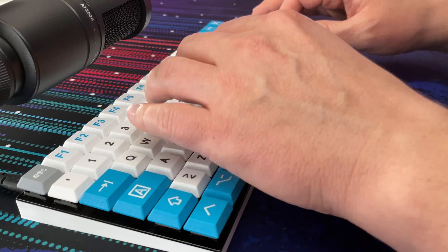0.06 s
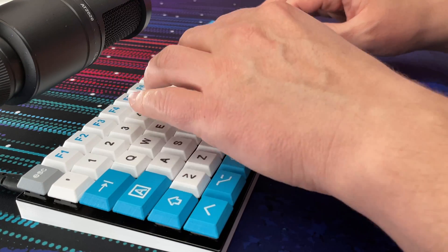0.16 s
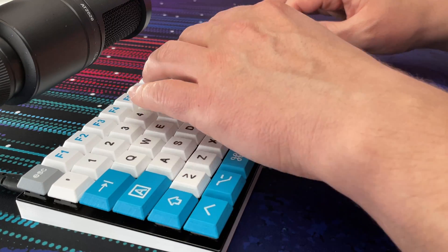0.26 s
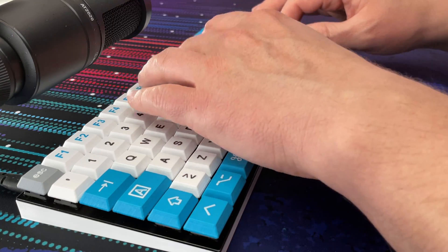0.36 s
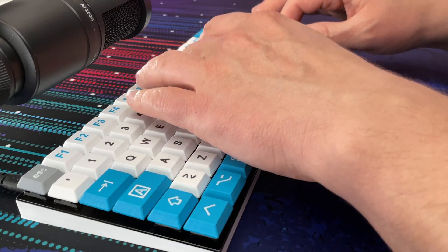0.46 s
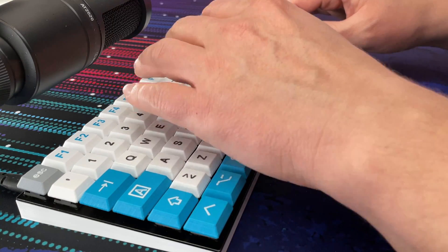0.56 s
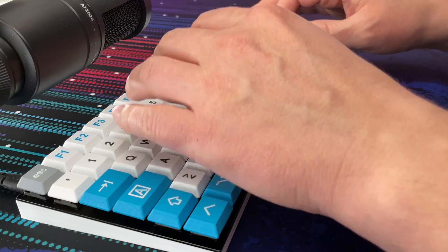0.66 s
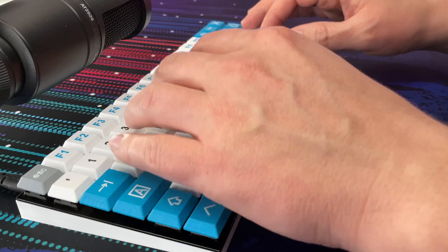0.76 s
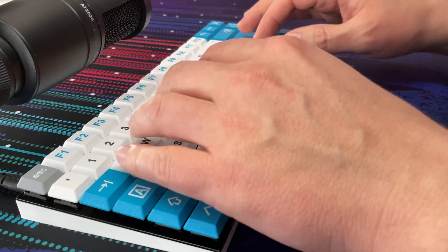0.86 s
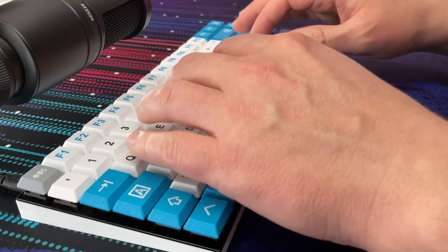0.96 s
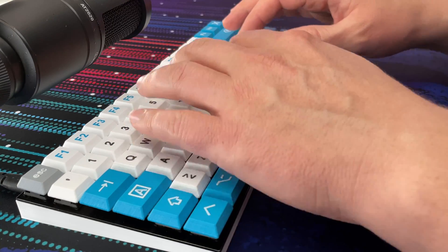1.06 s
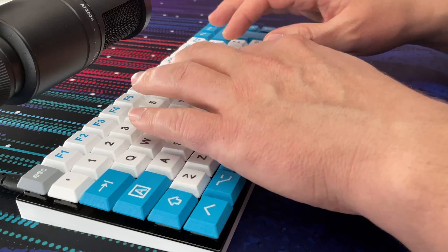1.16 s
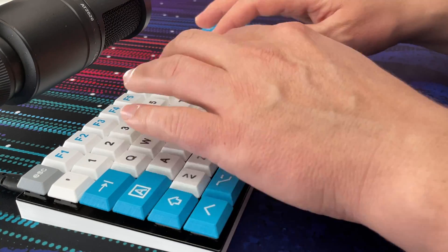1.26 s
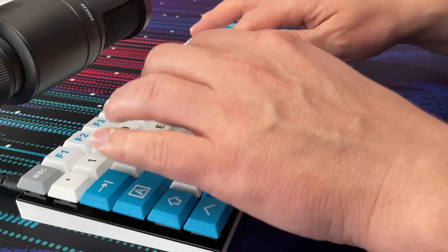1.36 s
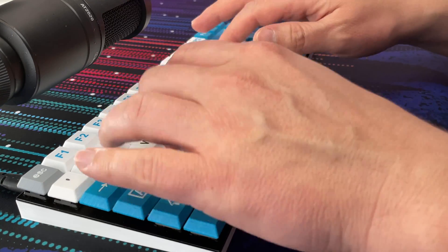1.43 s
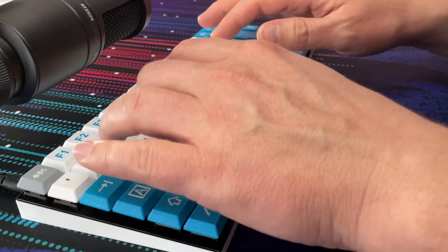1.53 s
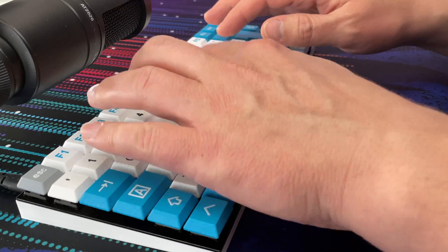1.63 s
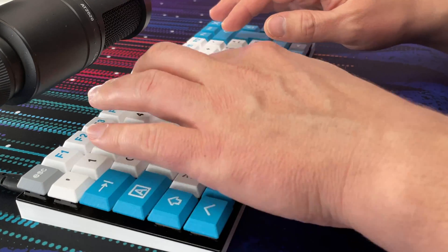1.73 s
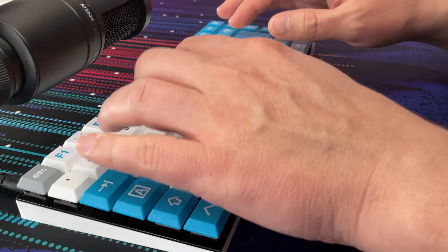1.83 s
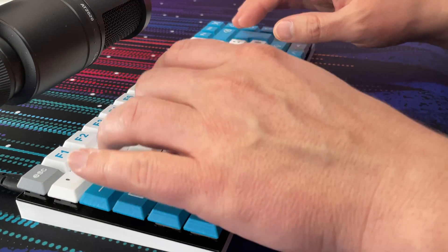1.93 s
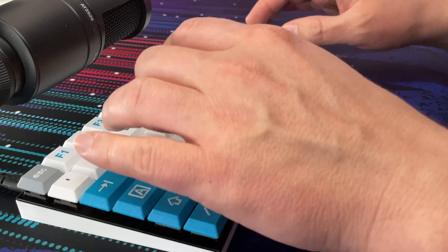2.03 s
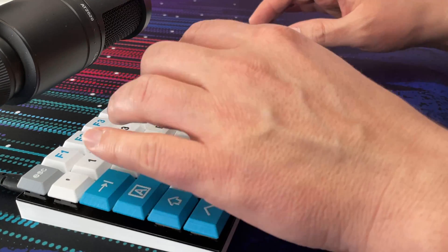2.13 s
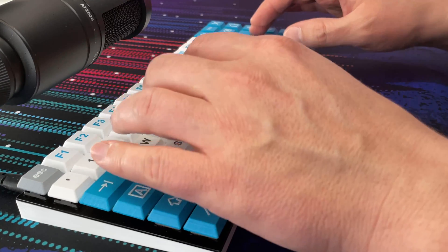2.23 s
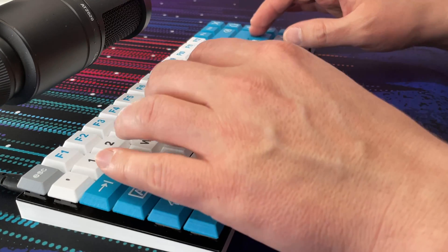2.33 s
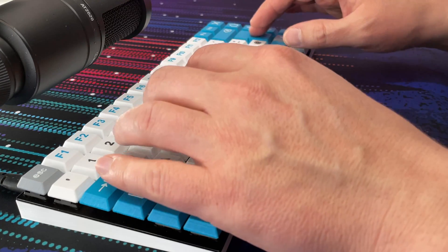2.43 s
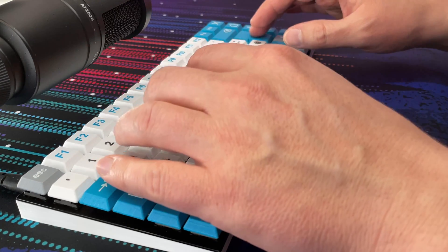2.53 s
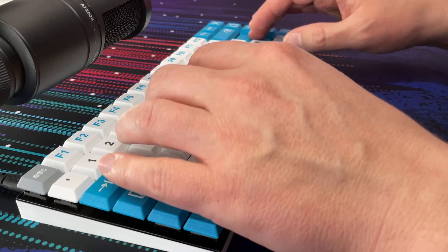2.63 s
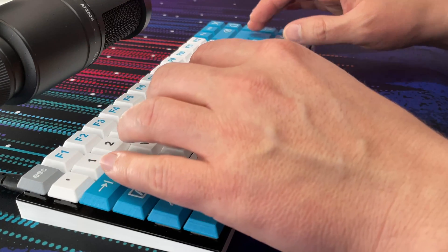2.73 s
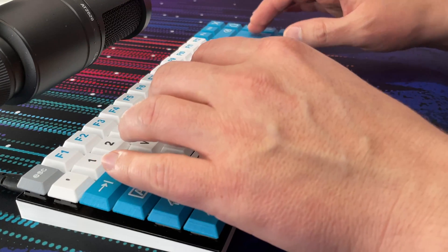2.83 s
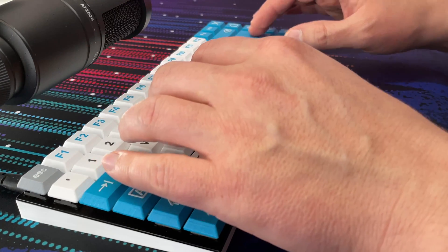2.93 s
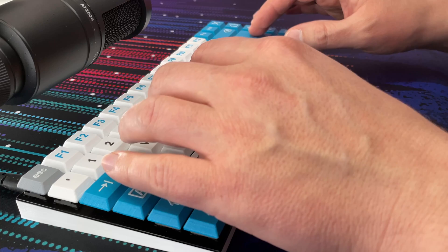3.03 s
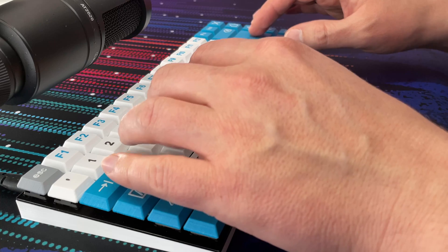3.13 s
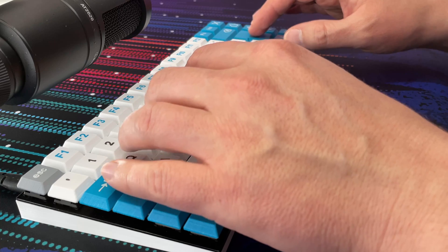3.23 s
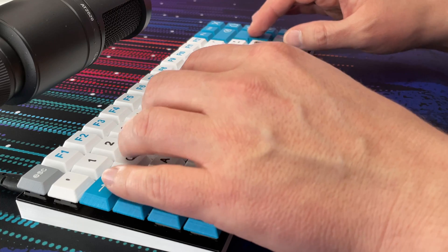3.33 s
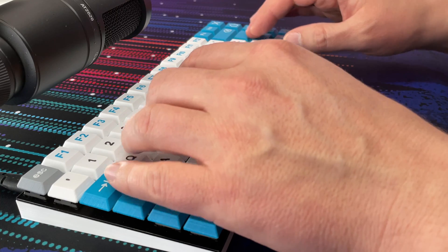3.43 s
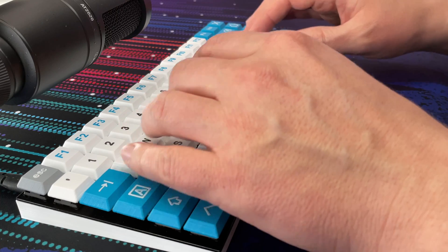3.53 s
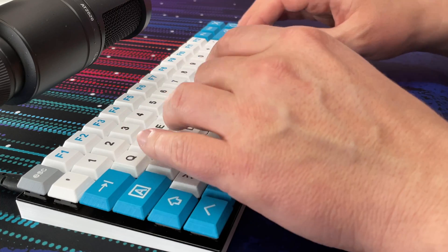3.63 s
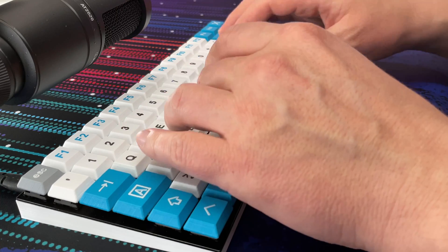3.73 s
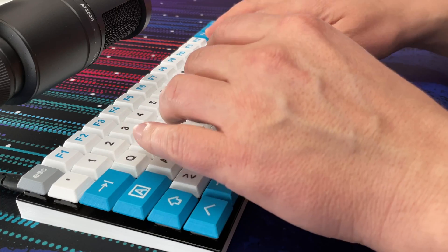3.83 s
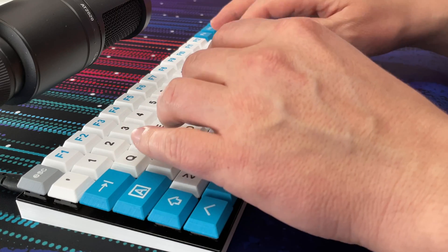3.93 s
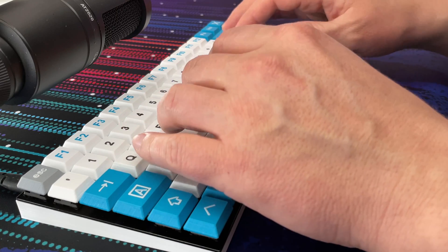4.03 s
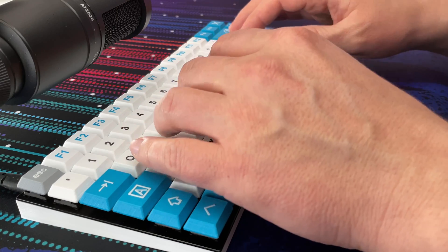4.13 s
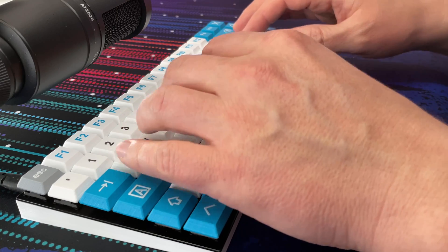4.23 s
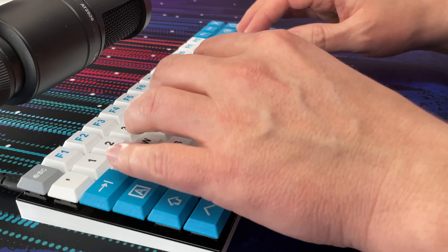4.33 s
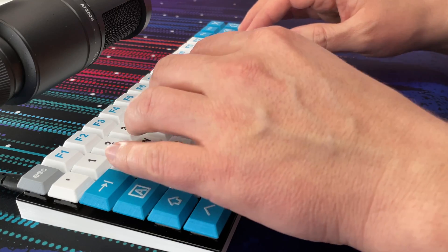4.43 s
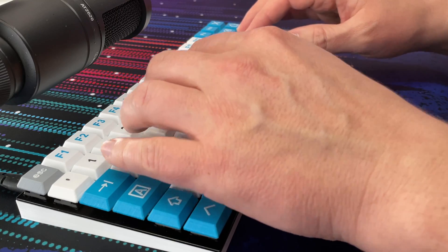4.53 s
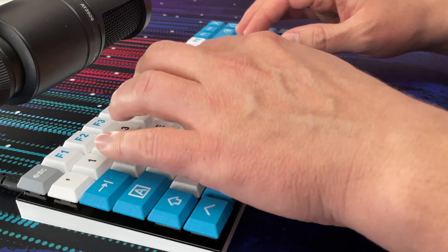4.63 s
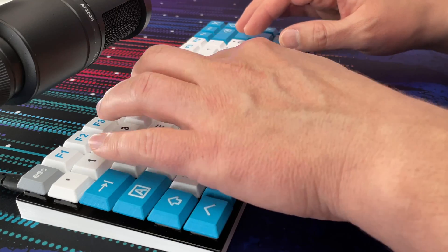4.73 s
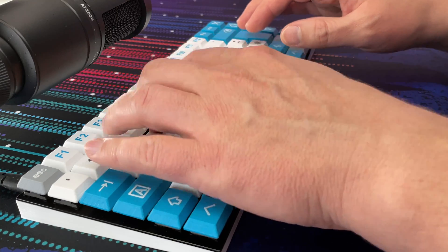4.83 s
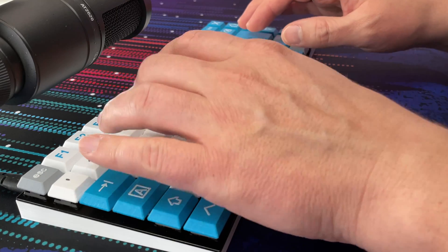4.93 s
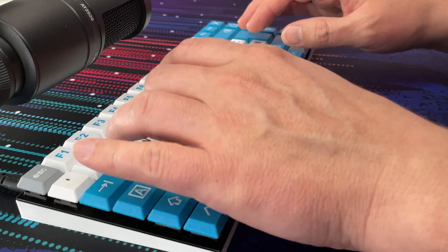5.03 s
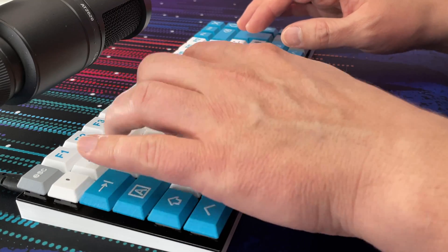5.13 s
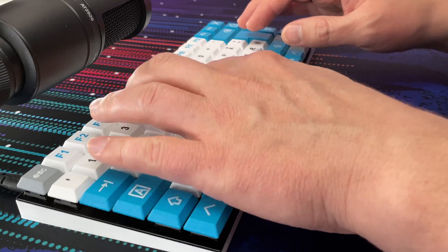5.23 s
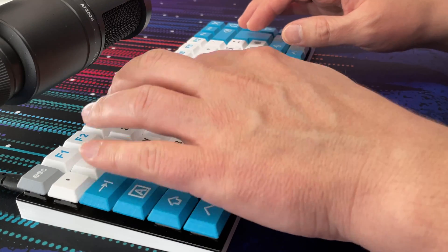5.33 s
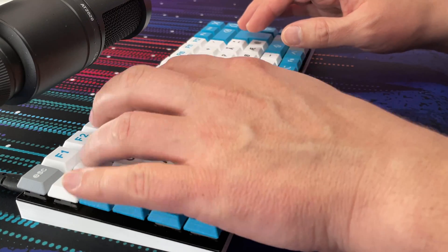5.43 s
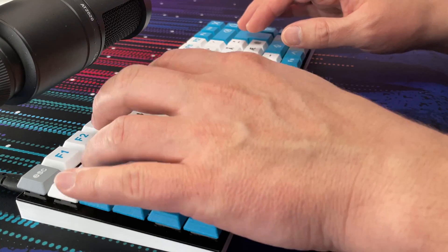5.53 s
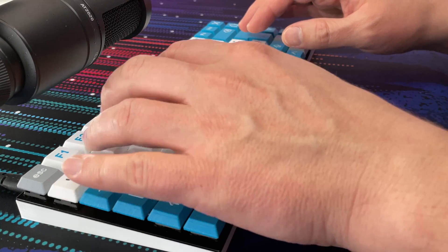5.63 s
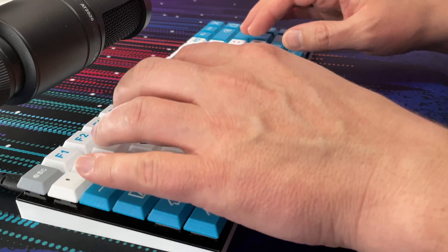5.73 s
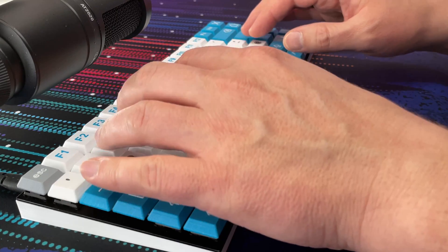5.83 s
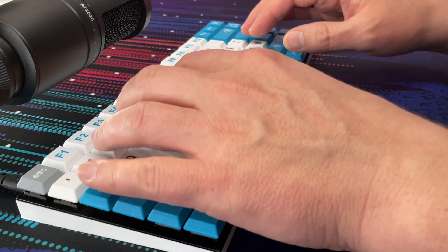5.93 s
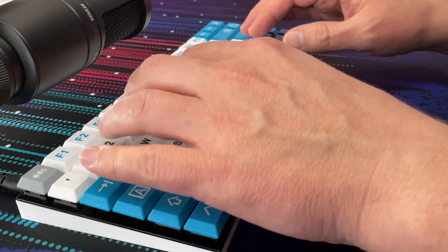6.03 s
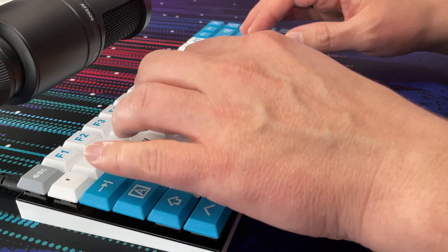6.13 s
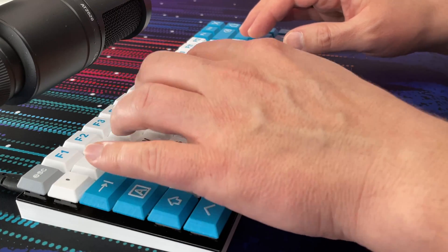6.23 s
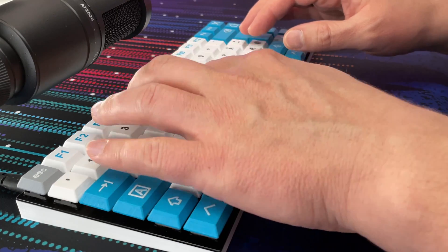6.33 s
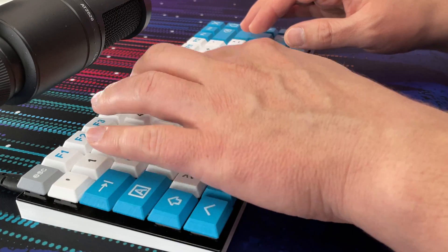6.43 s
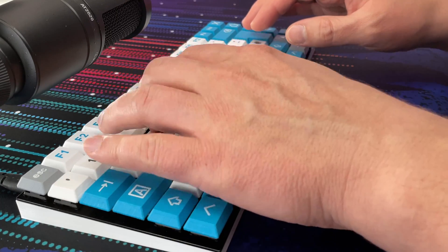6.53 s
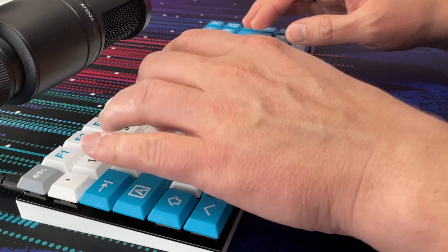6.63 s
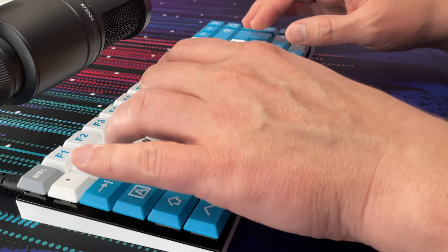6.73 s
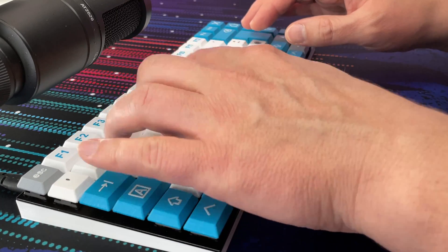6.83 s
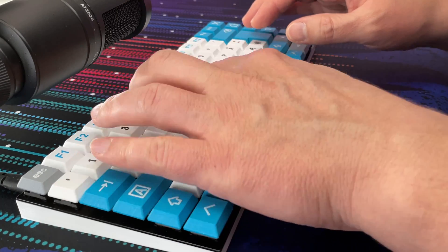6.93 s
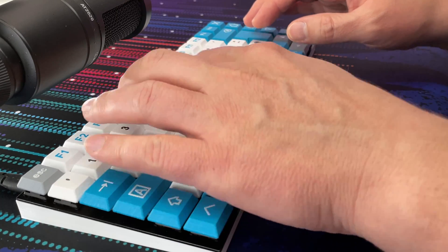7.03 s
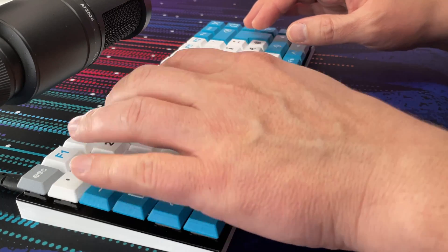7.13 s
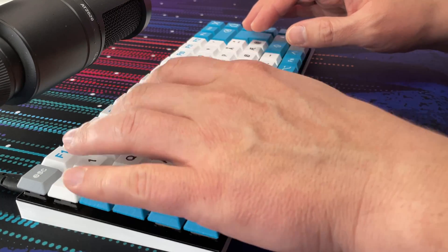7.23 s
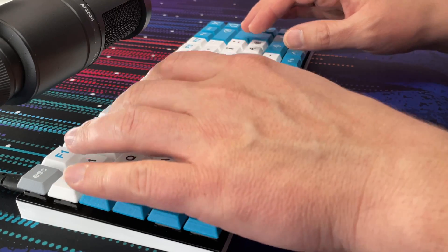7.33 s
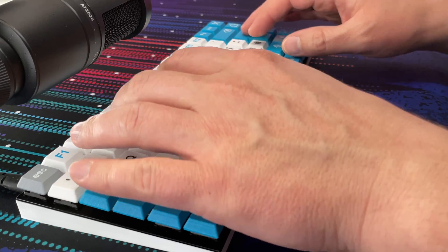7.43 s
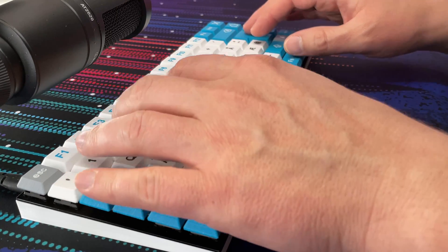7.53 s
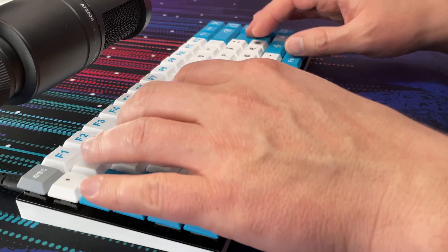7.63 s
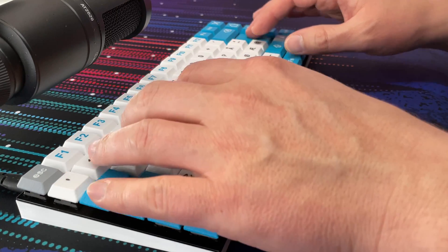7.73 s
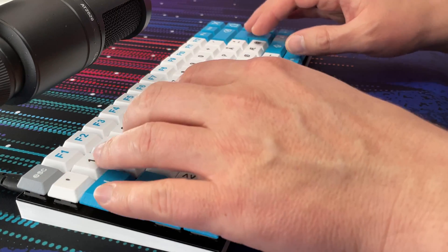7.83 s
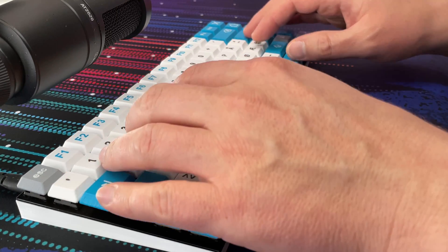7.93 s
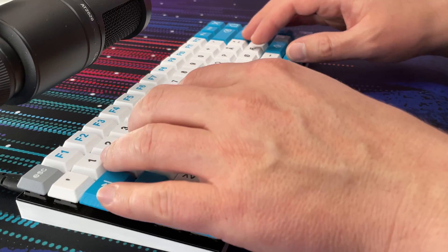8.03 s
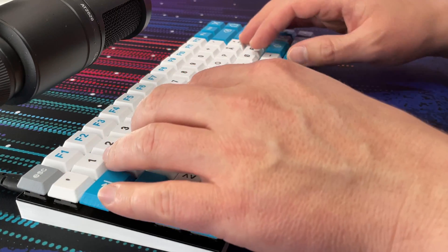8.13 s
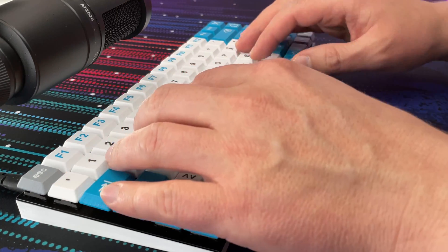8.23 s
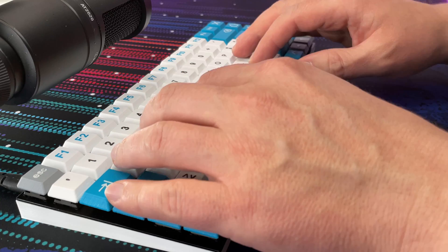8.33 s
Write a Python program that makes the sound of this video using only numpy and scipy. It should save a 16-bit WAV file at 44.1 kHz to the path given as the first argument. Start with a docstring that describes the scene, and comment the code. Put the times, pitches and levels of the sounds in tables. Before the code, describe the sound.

In a quiet room, fingers type on a small mechanical keyboard, with the microphone a hand's width away on the same desk. A light release clicks at 0.1 seconds, then a strong bright clack at 0.4 and its return, with another release at 0.6. After a pause, five or six keys come quickly from 1.1 to 1.9, each a hard plastic click, small rattle and low desk thump, followed by a lighter snap back. A lone softer key falls at 2.55. Skin barely brushes near 3.5, two keys follow at 3.65 and 3.8, and a muted press at 4.25. From 4.7 to 7.3 keys arrive steadily but unevenly, the sharpest near 6.9, then a last one at 7.6. Faint scraping over caps closes the scene until 8.4. Spring pings are nearly inaudible; faint low rumble and a distant motor hum, fullest around 4.6, lie underneath.

```python
"""Fingers typing in bursts on a small mechanical keyboard, over quiet room noise and a distant motor.
A microphone stands on the same desk, a hand's width away. Each key is touched, slides, stops and snaps back.
Caps and case are decaying modes struck by short pushes, slides are noise coloured by one cap,
and the desk thumps up the stand. Springs ping faintly as tone pairs; skin brushes over the caps twice.
The motor is a sum of sine orders, the room filtered noise."""
import sys
import numpy as np
from scipy import signal
from scipy.fft import rfft, irfft
from scipy.io import wavfile
from scipy.ndimage import uniform_filter1d

SR = 44100
rng = np.random.default_rng(int(sys.argv[2]) if len(sys.argv) > 2 else 0)


def to_wav(s):
    """Save 16-bit WAV."""
    ch = np.atleast_2d(s).T  # columns
    pcm = np.round(np.clip(ch, -1, 1) * 32767)  # PCM
    wavfile.write(sys.argv[1], SR, pcm.astype(np.int16))


N = 369558

# Modes of caps and plate. Each row: frequency in Hz, relative level in dB, t60 in seconds.
CAP_MODES = [(1213, -12.5, 0.036), (1760, -5.5, 0.009), (2226, -6.5, 0.011), (2770, -7.5, .012),
             (3200, -3, 0.009), (3744, -6.5, 0.011), (4172, 0, 0.0073), (4530, 0, 0.004),
             (6290, -4, 0.0037), (6770, -1.5, 0.0047), (7975, -5.5, 0.0037), (10960, -11.5, 0.0057),
             (14760, -20, 0.0076)]
# Modes of the keyboard case. Each row: frequency in Hz, relative level in dB, t60 in seconds.
CASE_MODES = [(185.2, -.5, .06), (251, -5.5, 0.098), (304.5, -4.5, 0.057), (390, -3.5, 0.03),
              (474, -8, 0.071), (637, -11, 0.045), (900, -12, 0.024)]
# Modes of desk and stand. Each row: frequency in Hz, relative level in dB, t60 in seconds.
DESK_MODES = [(28, -16, 0.087), (43.3, -5, 0.4), (77.4, -0.5, .2), (109.4, 4, 0.099), (149.4, -8, 0.079)]


def undb(db):
    """Decibels to amplitude."""
    return 10 ** (np.asarray(db) / 20)


def add(out, start_s, sound):
    """Mix a sound in at start_s, cut at the end of out."""
    i = int(start_s * SR)
    out[i:i + len(sound)] += sound[:len(out) - i]


def bump(length_s):
    """Smooth force of a soft contact."""
    return np.hanning(int(length_s * SR) + 2)[1:]


def ring(modes, gains, push, length_s, detune=0.):
    """Decaying modes driven by a short push; peak 1."""
    hz, db, t60_s = np.transpose(modes)[:, :, None]
    t = np.arange(int(length_s * SR)) / SR
    decay = np.exp(-np.log(1000) * t / t60_s)
    tones = np.sin(2 * np.pi * hz * (1 + detune) * t)
    body = (gains * undb(db) * tones * decay).sum(0)
    sound = signal.fftconvolve(body, push)
    return sound / np.abs(sound).max()


def air_noise():
    """Room rumble and microphone hiss: noise shaped to a spectrum."""
    # Each row: frequency in Hz, relative density in dB per Hz.
    spectrum = [(20, 1), (70, -2), (160, -22), (500, -28.5), (900, -40), (2500, -44), (15000, -50)]
    rms_db, top_hz = -66.5, 15800
    knot_hz, knot_db = np.transpose(spectrum)
    hz = np.maximum(np.arange(N // 2 + 1) * SR / N, 1)
    gain = undb(np.interp(np.log(hz), np.log(knot_hz), knot_db)) * (hz < top_hz)
    noise = irfft(rfft(rng.standard_normal(N)) * gain, N)
    return noise * undb(rms_db) / np.std(noise)


def motor():
    """Orders of a far motor that swell and fade, the weak ones at random, on a wandering speed."""
    # Each row: time in seconds, first order rms in dB, fourth order rms in dB.
    levels = [(0, -74, -91), (1, -94.5, -96), (2.198, -77, -103), (3.398, -76, -80.5), (4.6, -61.5, -81.5),
              (6.301, -68, -89.5), (8.38, -73, -92)]
    # Weak orders. Each row: multiple of the motor frequency, median rms level in dB.
    weak_orders = [(5, -95), (8, -98), (10, -101)]
    mean_hz, wander_share, weak_swing_db = 68.9, 0.0067, 6.0
    t = np.arange(N) / SR
    knot_s, first_db, fourth_db = np.transpose(levels)
    wander = np.interp(t, np.arange(40) / 4, rng.standard_normal(40))
    phase = 2 * np.pi * np.cumsum(mean_hz * (1 + wander_share * wander)) / SR
    out = undb(np.interp(t, knot_s, first_db)) * np.sin(phase)
    out += undb(np.interp(t, knot_s, fourth_db)) * np.sin(4 * phase)
    for order, db in weak_orders:
        swing_db = weak_swing_db * np.interp(t, np.arange(30) / 3, rng.standard_normal(30))
        out += undb(db + swing_db) * np.sin(order * phase)
    return np.sqrt(2) * out


def strokes():
    """Stops (s, dB, Hz, treble, knock, thump, contact) and touches (s, dB, Hz, slide dB, s, speeds)."""
    # Each row: finger lands in seconds, bottom in seconds, top in seconds, landing tick in dB,
    # bottom click in dB, top click in dB, cap pitch down in Hz, cap pitch up in Hz, treble down in dB,
    # treble up in dB, case knock down in dB, case knock up in dB, desk thump down in dB.
    keys = [(0.3544, 0.378, 0.4603, -44.5, -18, -24, 3610, 3490, 10, 14.5, -47.5, -46, -30.5),
            (1.0906, 1.1067, 1.1724, -35, -25.5, -29, 3280, 3200, 0, .5, -56, -56, -35.5),
            (1.299, 1.313, 1.3954, -38, -24.5, -29, 4440, 4500, 11, 11.5, -50.5, -45.5, -33.5),
            (1.417, 1.4367, 1.5239, -33.5, -25, -26, 4050, 3780, 4.5, 7.5, -41, -47, -30),
            (1.6346, 1.6498, 1.726, -28, -22.5, -24.5, 3290, 2960, 8.5, 12.5, -49.5, -52, -32),
            (1.8405, 1.8525, 1.927, -28, -20, -24, 4710, 4090, 2, 10, -40, -51.5, -27),
            (2.541, 2.5584, 2.6586, -55, -29, -30.5, 4570, 2305, 8.5, 14, -39, -44, -36),
            (3.6106, 3.6457, 3.7316, -42, -27, -30.5, 4310, 3270, 11.5, 9, -51, -50.5, -32.5),
            (3.7818, 3.795, 3.8755, -39.5, -23.5, -32, 4570, 3380, 12.5, 6.5, -45, -47.5, -31),
            (4.1893, 4.2462, 4.35, -45, -44, -31.5, 1870, 3410, -4, 5, -50.5, -38, -38),
            (4.653, 4.6782, 4.7842, -47, -24, -27.5, 4270, 2740, 0.5, 11, -58.5, -63.5, -34.5),
            (4.7749, 4.8032, 4.8716, -32.5, -27.5, -24.5, 2820, 4320, 11, 7, -46, -47, -33.5),
            (4.9885, 5.013, 5.097, -34.5, -23, -27, 4080, 2230, 7.5, 10, -41, -50.5, -28.5),
            (5.176, 5.1899, 5.2814, -34, -21, -32, 3720, 2760, 6.5, 11, -55, -57, -33.5),
            (5.4034, 5.4373, 5.5496, -51, -25.5, -34.5, 1800, 1930, 10.5, 7.5, -43.5, -48.5, -43.5),
            (5.8638, 5.8964, 6.0084, -38, -29.5, -34, 3550, 3390, 14.5, 4.5, -40, -39, -31),
            (6.3, 6.319, 6.4127, -34, -23.5, -27, 4260, 3360, 3.5, 11.5, -57, -54.5, -38.5),
            (6.4828, 6.5015, 6.5873, -30.5, -22.5, -26, 3560, 4050, 9, 9, -53, -46.5, -32.5),
            (6.681, 6.7076, 6.8011, -32.5, -24.5, -22.5, 3640, 3810, 10, 13, -49, -46, -30),
            (6.8625, 6.8774, 6.9842, -39, -17.5, -24, 4320, 3360, 6.5, 9.5, -54, -52, -31),
            (7.2, 7.2245, 7.3218, -33.5, -25, -34.5, 3710, 2620, 13.5, 12.5, -43.5, -49.5, -35.5),
            (7.607, 7.6242, 7.7469, -49.5, -21, -34.5, 2730, 2340, 16, 12.5, -38, -44, -34)]
    # Held keys let go. Each row: top in seconds, click in dB, cap pitch in Hz, treble in dB, knock in dB.
    held = [(0.101, -34, 3090, 8.5, -50), (0.612, -31.5, 5400, 9, -44.5)]
    # Fingers grazing caps, caps shifting. Each row: start in seconds, tick in dB, cap pitch in Hz.
    grazes = [(.045, -51, 3010), (.418, -47, 3430), (1.085, -50, 2800), (1.362, -54, 3810),
              (1.477, -57, 1200), (1.632, -47, 3400), (1.692, -47, 1430), (2.0927, -60, 2620),
              (2.508, -64, 1880), (2.615, -58, 4000), (2.6395, -44, 7410), (4.2123, -46, 3170),
              (4.252, -52, 4200), (4.341, -43, 3380), (4.713, -52, 2750), (5.168, -42, 3930),
              (5.2317, -52, 4470), (5.261, -42, 3290), (5.272, -43, 2760), (5.511, -54, 1940),
              (5.876, -47, 3120), (5.997, -43, 3400), (6.293, -50, 4220), (6.381, -50, 3270),
              (6.756, -51, 1400), (6.846, -38, 3300), (6.931, -49, 3300), (7.398, -64, 2720),
              (7.434, -62, 2500), (7.72, -38, 6490)]
    # A pressing finger holds the cap still. Columns: rebound share, plate in dB, snap share.
    bottom_contact = (.15, -3.5, .9)
    # A freed cap rattles. Columns: rebound share, plate in dB, snap share.
    top_contact = (.42, 2.5, .55)
    fall_slide_db, ref_fall_s, speed_power = -55, .018, 1.2  # a faster fall slides louder
    start_speed = .3  # of a pressed key, share of its speed at the stop
    rise_s, lift_db, rise_slide_db = .032, -38, -61  # lift tick is relative to the top click
    top_thump_db = -14.5  # relative to the top click
    graze_slide_db, graze_s = -21, .028  # slide is relative to the tick

    stop, touch, tops = [], [], list(held)
    for (land_s, bottom_s, top_s, tick_db, down_db, up_db, down_hz, up_hz,
         treble_db, up_treble_db, knock_db, up_knock_db, thump_db) in keys:
        fall_s = bottom_s - land_s
        slide_db = fall_slide_db - 20 * speed_power * np.log10(fall_s / ref_fall_s)
        stop.append((bottom_s, down_db, down_hz, treble_db, knock_db, thump_db, *bottom_contact))
        touch.append((land_s, tick_db, down_hz, slide_db, fall_s, start_speed, 1))
        tops.append((top_s, up_db, up_hz, up_treble_db, up_knock_db))
    for s, db, hz, treble_db, knock_db in tops:
        stop.append((s, db, hz, treble_db, knock_db, db + top_thump_db, *top_contact))
        touch.append((s - rise_s, db + lift_db, hz, rise_slide_db, rise_s, 0, 1))
    for s, db, hz in grazes:
        touch.append((s, db, hz, db + graze_slide_db, graze_s, 1, 0))
    return stop, touch


def click(hz, treble_db, chance, rattle_s, rebound, plate_db, snap):
    """A contact and weaker rebounds crack and ring the cap; modes near its own pitch gain most."""
    mode_hz, count = np.array(CAP_MODES)[:, :1], len(CAP_MODES)
    gain_db = 5.6 * np.exp(-(np.log(mode_hz / hz) / 0.27) ** 2)
    gain_db = gain_db + treble_db * (mode_hz > 5500) + plate_db * (mode_hz < 1500)
    gain_db = gain_db + 1.8 * chance[:count, None]
    gains = undb(gain_db) * (-1) ** np.arange(count)[:, None]
    push = np.zeros(400)
    push[0] = 1
    when = (rattle_s * SR * np.abs(chance[count:count + 6])).astype(int) + 7
    np.add.at(push, np.minimum(when, 399), rebound * chance[count + 6:count + 12])
    crack = np.convolve(np.diff(push, prepend=0), bump(.0001))  # the bare contact, far up the treble
    sound = ring(CAP_MODES, gains, push, .05, 0.04 * chance[:count, None][::-1])
    add(sound, 0, undb(treble_db - 10) * crack)
    sound += snap * ring([(hz, 0, .004)], -1, push, .05)  # short snap of the stem
    return sound


def slips():
    """Dense uneven slips of plastic on plastic; rms 1."""
    uneven_db = 3.5 * np.minimum(rng.exponential(size=N + SR), 5)
    x = rng.standard_normal(N + SR) * undb(uneven_db)
    return x / np.std(x)


def grit(slipping, cap):
    """Slips take the colour of the one cap they shake, its ring damped."""
    damp_s = .0006  # time constant under a finger
    colour = cap[:400] * np.exp(-np.arange(400) / (damp_s * SR))
    return signal.fftconvolve(slipping, colour / np.linalg.norm(colour))


def room():
    """Level of loose caps shivering after a contact, plus the fainter, longer tail off the walls."""
    shiver_t60_s, shiver_db = 0.044, -20
    room_t60_s, room_db = 0.26, -41
    t = np.arange(int(.3 * SR)) / SR
    return undb(shiver_db - 60 * t / shiver_t60_s) + undb(room_db - 60 * t / room_t60_s)


def hollow():
    """Noise with the colour of the case; rms 1."""
    sound = signal.fftconvolve(rng.standard_normal(N), ring(CASE_MODES, 1, np.ones(1), 0.046))[:N]
    return sound / np.std(sound)


def touches():
    """A light tick, then a scrape that follows the slide's speed; the finger's weight nudges the desk."""
    grip_db, tail_db, case_db = 4.5, -7, -6.5
    air, solid, slide = np.zeros((3, N))
    rows, tail, slip = strokes()[1], room(), slips()
    grip = uniform_filter1d(np.repeat(rng.standard_normal(N // 80), 90), size=60)  # comes and goes
    catches = slip * undb(grip_db * grip)[:len(slip)]
    chances = rng.standard_normal((len(rows), 50))
    for (s, db, hz, slide_db, slide_s, first, last), chance in zip(rows, chances):
        # a light touch hardly moves the plate
        cap = click(hz, -1.3, chance, rattle_s=0.0013, rebound=.3, plate_db=-7, snap=0.46)
        speed = undb(slide_db) * np.linspace(first, last, int(slide_s * SR))
        i = int(s * SR)
        add(air, s, undb(db) * cap)
        add(air, s, undb(db + tail_db) * grit(tail * slip[i:i + len(tail)], cap))
        add(air, s, grit(speed * catches[i:i + len(speed)], cap))
        add(slide, s, speed)
        detune = 0.019 * chance[-len(DESK_MODES):, None]
        nudge = ring(DESK_MODES, chance[:len(DESK_MODES), None], bump(0.0039), .5, detune)
        add(solid, s, -undb(0.52 * db - 24.5) * nudge)
    return air + slide * undb(case_db) * hollow(), solid  # the case hums along


def knock(chance):
    """A ragged blow rings the case, from a different spot each time."""
    push = np.repeat(chance * np.exp(-np.arange(len(chance)) / 32.0), repeats=12)
    signs = np.sign(chance[:len(CASE_MODES), None])
    return ring(CASE_MODES, signs, push, 0.29, 0.049 * chance[-len(CASE_MODES):, None])


def stops():
    """The stem slams home: caps click and shiver, the case knocks, a late thump goes through the desk."""
    # wide caps knock the case hardest and rattle longest: dB of rattle per dB of knock
    loose_from_db, loose_slope = -48, .5
    boom_db, boom_t60_s = -19.5, 0.32  # the case mutters on, relative to the knock
    thump_delay_s = .005
    air, solid, shiver, boom = np.zeros((4, N))
    fade = undb(boom_db - 60 * np.arange(int(.3 * SR)) / SR / boom_t60_s)
    rows, slip, tail = strokes()[0], slips(), room()
    chances = rng.standard_normal((len(rows), 30))
    for row, chance in zip(rows, chances):
        s, db, hz, treble_db, knock_db, thump_db, rebound, plate_db, snap = row
        loose = undb(loose_slope * max(knock_db - loose_from_db, 0))
        cap = click(hz, treble_db, chance, rattle_s=0.00099 * loose, rebound=rebound * loose,
                    plate_db=plate_db, snap=snap / loose)
        add(air, s, undb(db) * cap)
        add(boom, s, undb(knock_db) * fade)
        add(shiver, s, undb(db) * loose * grit(tail * slip[int(s * SR):][:len(tail)], cap))
        add(air, s, undb(knock_db) * knock(chance))
        gains = undb(3.4 * chance[:len(DESK_MODES), None])
        detune = 0.041 * chance[-len(DESK_MODES):, None]
        thump = ring(DESK_MODES, gains, bump(0.0059), .5, detune)
        add(solid, s + thump_delay_s, undb(thump_db) * thump)
    dull = signal.lfilter(*signal.butter(1, 4500, fs=SR), shiver)  # mat and walls swallow the treble
    return air + dull + boom * hollow(), solid


def springs():
    """Thin steel tones of return springs ringing on; a close pair makes each one waver."""
    # Each row: start in seconds, frequency in Hz.
    pings = [(1.927, 2020), (3.873, 1370), (4.871, 2020), (4.871, 3978), (5.28, 3951), (5.28, 1545),
             (5.548, 1540), (5.55, 3801), (6.586, 2080), (6.984, 3946)]
    peak_db, t60_s = -80, .36
    out = np.zeros(N)
    for s, hz in pings:
        pair = [(hz, 0, t60_s), (1.008 * hz, -7, t60_s)]
        add(out, s, undb(peak_db) * ring(pair, 1, bump(.0001), .4))
    return out


def brushing():
    """Skin drags patchily over many caps at once: slip noise in one band per cap mode, each varying apart."""
    # One list per brush. Each row: time in seconds, relative level in dB.
    brushes = [
        [(3.4, -98), (3.6, -86.5)],
        [(7.8, -92), (8.0, -96.5), (8.06, -89), (8.15, -81.5), (8.19, -86.5), (8.28, -80), (8.38, -88)],
    ]
    t = np.arange(N) / SR
    level = sum(undb(np.interp(t, *np.transpose(span), left=-200, right=-200)) for span in brushes)
    out = np.zeros(N)
    for hz, db, _ in CAP_MODES:
        patchy_db = 3.5 * np.interp(t, np.arange(300) / 30, rng.standard_normal(300))
        band = signal.fftconvolve(slips(), ring([(hz, 0, .003)], 1, np.ones(1), .01))[:N]
        out += undb(.1 * db - 19 + patchy_db) * band
    return level * out


def scene():
    """All sources summed to one channel."""
    keys = sum(stops()) + sum(touches())
    return (keys + brushing() + springs() + motor() + air_noise())[None]


def record(dry):
    """The recorder cuts the top with a steep elliptic low-pass."""
    top_hz, ripple_db, stop_db = 16600, .2, 70
    return signal.sosfilt(signal.ellip(10, ripple_db, stop_db, top_hz, fs=SR, output="sos"), dry)


dry = scene()
out = record(dry)
to_wav(out)
```